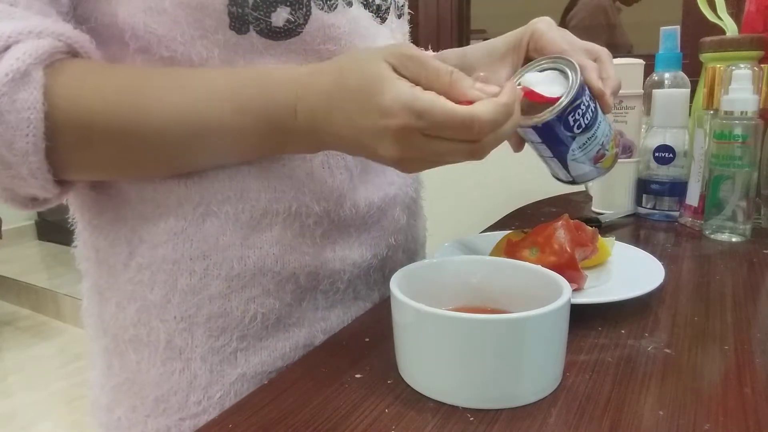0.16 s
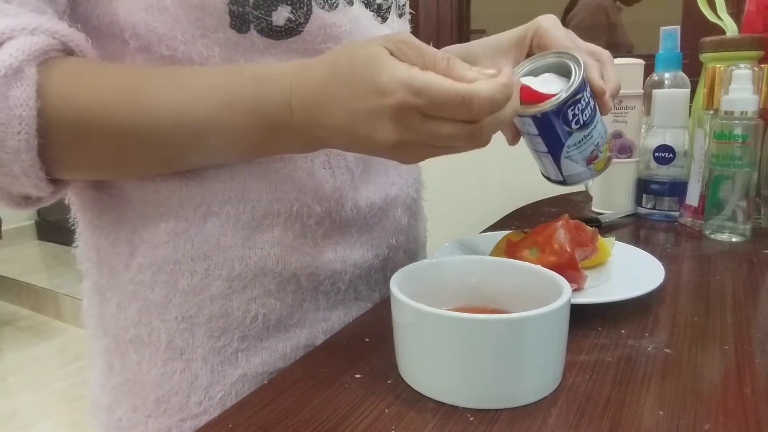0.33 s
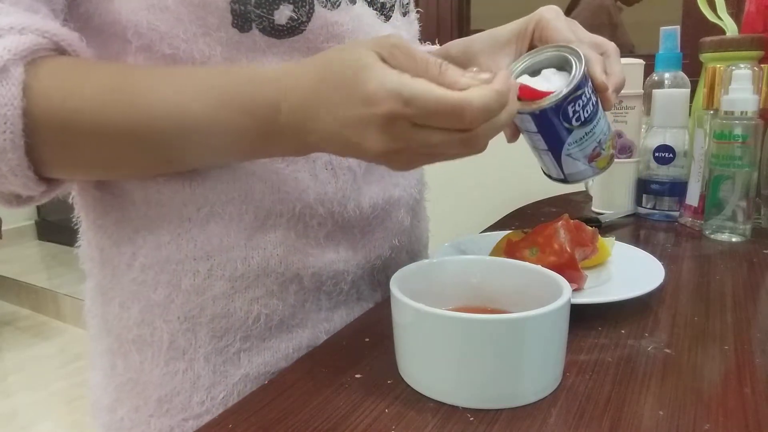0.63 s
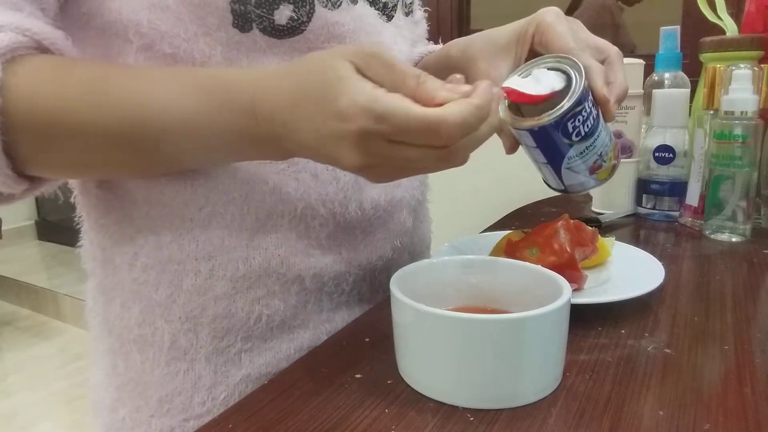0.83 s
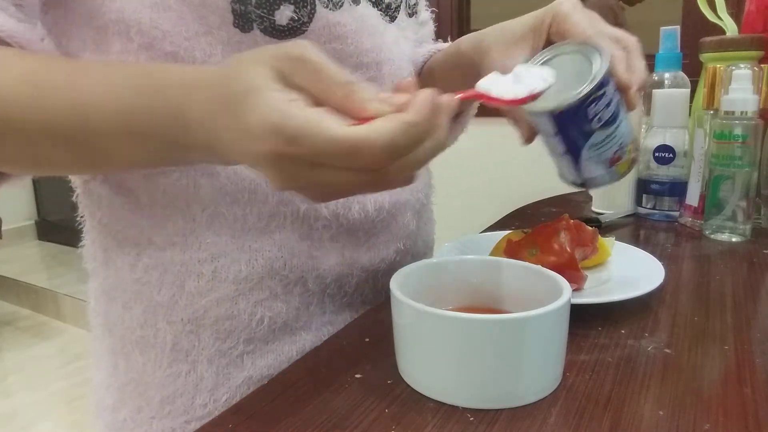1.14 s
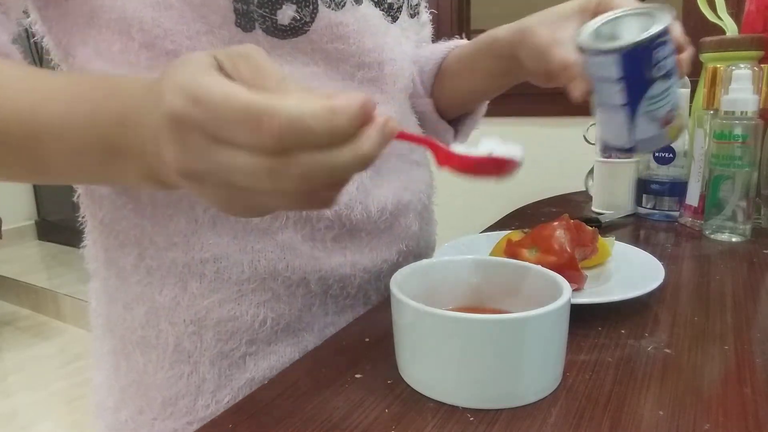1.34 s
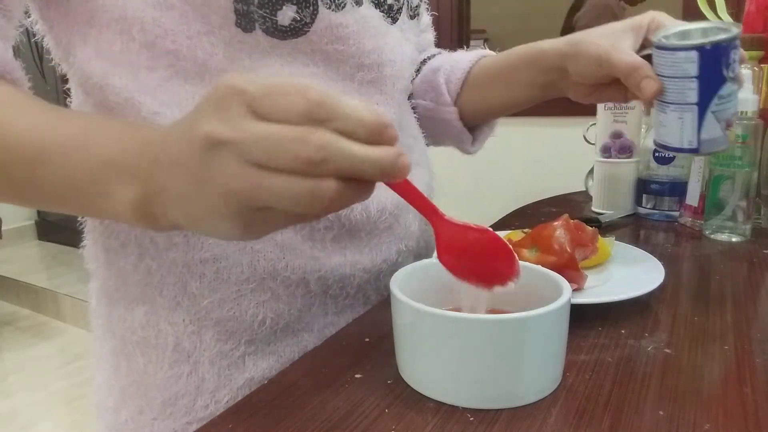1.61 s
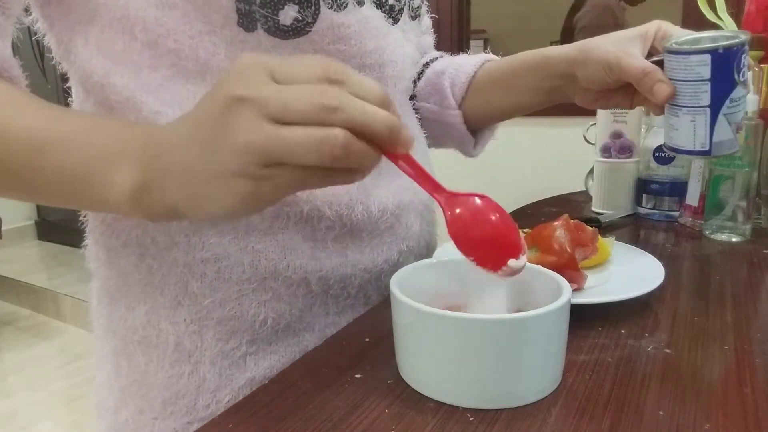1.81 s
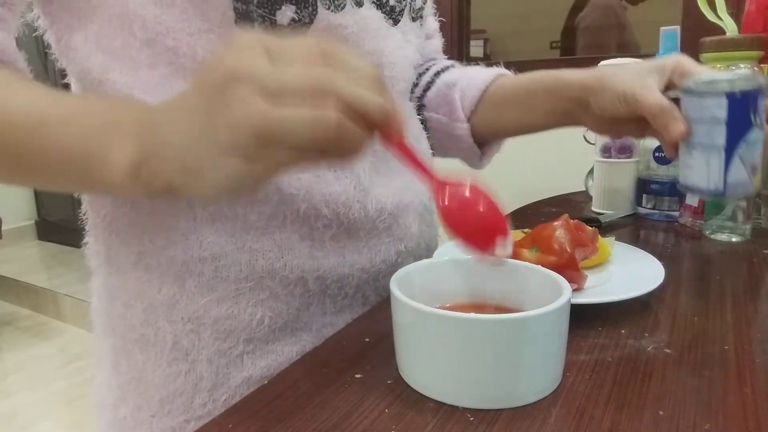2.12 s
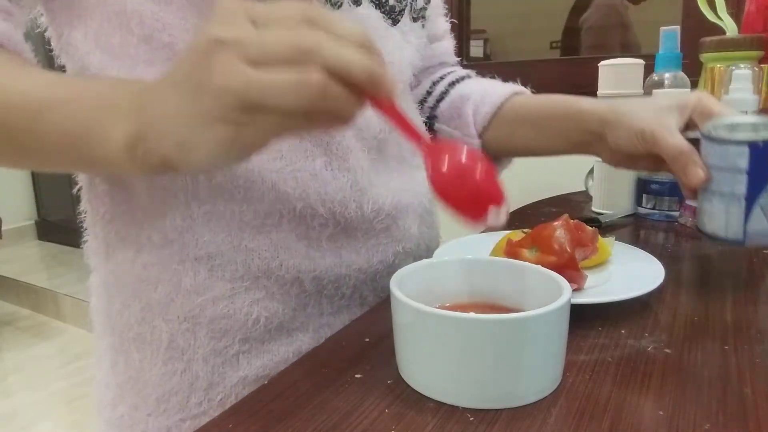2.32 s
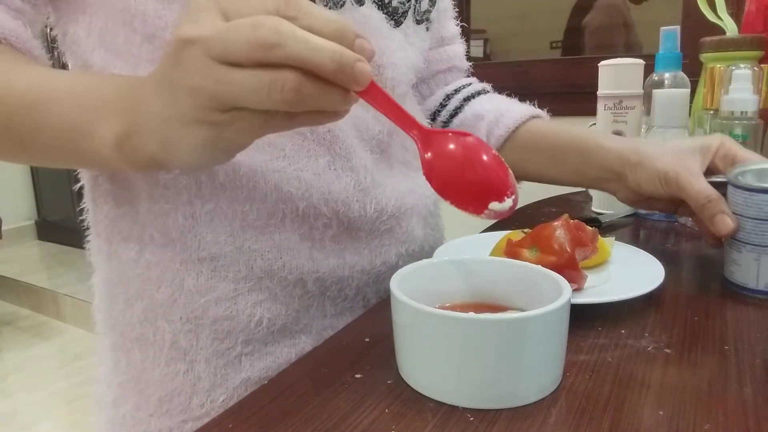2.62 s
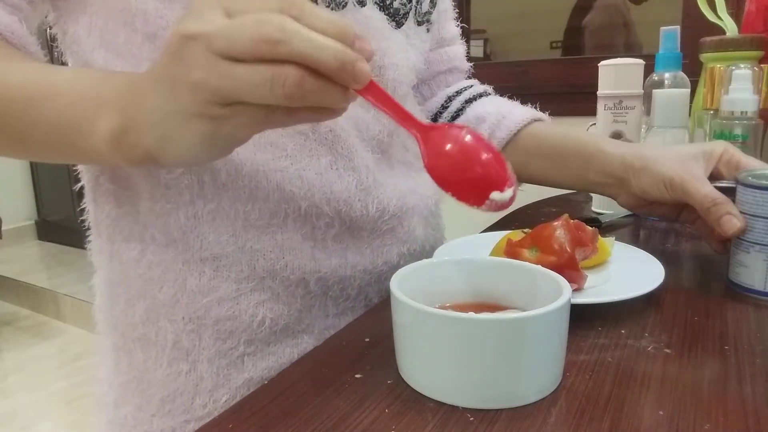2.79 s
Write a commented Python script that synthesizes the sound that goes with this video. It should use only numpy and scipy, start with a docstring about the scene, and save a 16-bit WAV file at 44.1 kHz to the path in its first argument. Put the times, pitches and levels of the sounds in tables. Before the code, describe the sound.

Gritty scrapes and ticks come from a plastic spoon scooping powder out of a tin. After a faint pouring hiss, the tin lands on wood with two knocks, over low kitchen rumble and microphone hiss.

```python
"""Spooning powder from a can

A plastic spoon drags through powder in a small metal can, ticking on its wall, and tips the powder
into a bowl with a soft hiss. The can is set down on a wooden table: one firm knock, then a rocking,
rattling second one. A quiet kitchen rumbles underneath; the microphone hisses."""
import sys
import numpy as np
from scipy import signal
from scipy.fft import rfft, irfft
from scipy.io import wavfile
from scipy.ndimage import uniform_filter1d

SR = 44100
rng = np.random.default_rng(int(sys.argv[2]) if len(sys.argv) > 2 else 0)


def to_wav(s):
    """Save 16-bit WAV."""
    ch = np.atleast_2d(s).T  # columns
    pcm = np.round(np.clip(ch, -1, 1) * 32767)  # PCM
    wavfile.write(sys.argv[1], SR, pcm.astype(np.int16))


N = 130095


def amp(db):
    return 10 ** (np.asarray(db) / 20)


def unit_level(x):
    return x / np.sqrt(np.mean(x ** 2) + 1e-20)


def at_pitch(points, hz):
    pitches, values = np.transpose(points)
    return np.interp(np.log(hz + 1), np.log(pitches + 1), values)


def at_time(points, t, column=1):
    rows = np.array(points, float)
    return np.interp(t, rows[:, 0], rows[:, column])


def add(mix, start, sound):
    part = mix[round(start * SR):][:len(sound)]
    part += sound[:len(part)]


def colour(x, points):
    """Turns each pitch up or down, following rows of Hz and dB."""
    return irfft(rfft(x) * amp(at_pitch(points, np.fft.rfftfreq(len(x), 1 / SR))), len(x))


def ring(x, hz, width):
    """Rings at one pitch; a narrower width rings longer."""
    decay = np.exp(-np.pi * width / SR)
    pole = decay * np.exp(2j * np.pi * hz / SR)
    return 2 * signal.lfilter([1 - decay], [1, -pole], x).real


def background():
    """The kitchen rumbles and the microphone hisses, with a faint flicker in the treble."""
    # Each row: pitch in Hz, relative level in dB.
    spectrum = [(25, -46), (45, -20), (87, 0.5), (160, -2), (270, -12.5), (350, -20), (480, -24.5),
                (800, -30), (1400, -30), (2200, -34.5), (3920, -39), (5500, -45), (7310, -51.5),
                (10000, -45.5), (14000, -38.5), (16000, -41.5)]
    # Each row: time in seconds, relative rumble level in dB.
    rumble_levels = [(0.0, -52.5), (0.63, -51.5), (1.12, -53.5), (2.22, -52), (2.52, -47.5), (2.66, -52.5)]
    # Each row: time in seconds, lift in dB (doubled for the hiss).
    lifts = [(0, 2), (.4, 1.5), (1.0, 1), (1.6, 1.5), (2.0, 2), (2.6, 3), (2.75, 4), (2.95, 5)]
    frames, hz = N // 256 + 5, np.fft.rfftfreq(1024, 1 / SR)
    t = np.arange(frames) * 256 / SR
    real, imag, flicker = rng.standard_normal((frames, 513, 3)).T
    flicker = unit_level(uniform_filter1d(uniform_filter1d(flicker, 8, 0), 10, 1))
    bass = 1 / (1 + (hz[:, None] / 375) ** 4)  # fades from 1 to 0 around 375 Hz
    noise = (real + 1j * imag) * amp(at_pitch(spectrum, hz)[:, None] + 0.7 * (1 - bass) * flicker)
    scale = np.std(signal.istft(noise, nperseg=1024, noverlap=768)[1])
    rumble_db = at_time(rumble_levels, t)
    noise *= amp(bass * (rumble_db - rumble_db.mean()) + (2 - bass) * at_time(lifts, t))
    return amp(-54.5) / scale * signal.istft(noise, nperseg=1024, noverlap=768)[1][:N]


def kitchen_echo(x):
    """Many small echoes blur together, each pitch fading at its own speed."""
    # Each row: pitch in Hz, seconds to fade by 60 dB, relative level in dB.
    bands = [(100, 0.71, 8), (247, 0.42, 6), (344, 0.81, 1), (500, 0.34, -9.5), (680, 0.8, -0.5),
             (905, 0.13, 3), (1390, 0.57, 2), (1720, 0.82, -9), (2700, .45, 2.5), (3950, 0.39, -4),
             (8000, 0.46, -2.5)]
    pitches, fade_s, db = np.transpose(bands)
    echoes = np.zeros(SR // 2)
    slots = np.arange(0, SR // 2 - 20, 20)
    echoes[slots + rng.integers(0, 20, len(slots))] = rng.choice([-1., 1.], len(slots))
    hz, t, spectra = signal.stft(echoes, SR, nperseg=512)
    spectra *= amp(-60 * t / np.interp(hz, pitches, fade_s)[:, None] + np.interp(hz, pitches, db)[:, None])
    tail = signal.istft(spectra, SR, nperseg=512)[1]
    gap = np.zeros(round(0.007 * SR))
    return signal.fftconvolve(x, np.concatenate([gap, tail / np.linalg.norm(tail)]))[:N]


def pour():
    """Fine powder hisses into the bowl; a high hiss stays to the end."""
    # Each row: time in seconds, level in dB.
    levels = [(1.68, -83), (1.72, -75), (1.76, -65), (1.8, -71), (2.0, -73.5), (2.4, -68.5), (2.65, -67),
              (2.95, -66)]
    # Each row: pitch in Hz, relative level in dB.
    spectrum = [(2000, -12), (5000, -5.5), (6500, -3), (8500, 0), (9400, -1), (9900, 5), (10500, -1),
                (12000, 0.5), (16000, -5)]
    hiss = unit_level(colour(rng.standard_normal(N), spectrum))
    return hiss * amp(at_time(levels, np.arange(N) / SR))


def can_ring(x, lip):
    """The can's tones depend on where the spoon touches, and waver as the contact shifts."""
    # Each row: pitch in Hz, width in Hz, dB with the spoon deep, dB with it at the lip.
    tones = [(740, 120, -8, -14), (1165, 42, 11.5, -7), (2770, 98, -1, -10.5), (3100, 100, -1, -3),
             (3760, 450, -10, -13), (4430, 150, -20, -8), (6500, 100, -33, -3), (7380, 130, -5, -6),
             (8100, 200, -19, -15), (9500, 68, -30, 4.5), (9800, 150, -3, -36), (11300, 230, 2, -22),
             (12200, 260, -5, -42)]
    drift = uniform_filter1d(rng.standard_normal((N // 256 + 1, len(tones))), 5, axis=0) * np.sqrt(5)
    waver_db = 2 * np.repeat(drift, 256, axis=0)[:N].T
    return sum((-1) ** k * ring(x * amp(deep + (top - deep) * lip + waver_db[k]), hz, width)
               for k, (hz, width, deep, top) in enumerate(tones))


def wall_ticks(lip):
    """The spoon snaps against the wall and rings the can."""
    # Each row: start in seconds, then dB below 2 kHz, at 2-5 kHz, at 6-10 kHz and above 11 kHz.
    ticks = [(0.108, -24, -34, -35, -34), (.4730, -54, -34.5, -33.5, -34), (0.4976, -47, -40, -60, -46),
             (0.509, -50, -44, -57, -56), (0.5239, -21, -27.5, -57, -56), (0.7088, -40, -35, -52.5, -61),
             (0.7558, -37.5, -42, -41.5, -46), (0.804, -55, -49, -54, -71)]
    t, snaps = np.arange(1024) / SR, np.zeros(N)
    rise_s, fade_s = 0.0007, 0.012
    envelope = amp(-60 * t / fade_s) * np.minimum(t / rise_s, 1)
    for start, low, mid, high, top in ticks:
        spectrum = [(300, low - 20), (500, low), (800, low), (1100, low - 6), (1700, low - 6),
                    (2500, mid), (4500, mid), (5500, high - 10), (7000, high), (10000, high),
                    (11500, top), (16000, top)]
        add(snaps, start, colour(rng.standard_normal(len(t)), spectrum) * envelope)
    return snaps + amp(1) * can_ring(snaps, lip)


def spoon():
    """Clumped powder grains crunch and ring the can under each stroke, joined by the wall ticks."""
    # One list per stroke. Each row: time in seconds, pressure in dB, place from 0 (deep) to 1 (lip).
    strokes = [
        [(0, -54, 0.04), (.03, -56, 0), (.06, -63, 0.1), (.079, -55, 0.18), (.095, -56.5, 0.5),
         (.13, -57.5, 0.5), (.15, -57, 0.03), (.175, -49.5, 0.32), (.19, -51, .4), (.205, -81, 0),
         (.22, -51, 0.6), (.245, -79, 0.6)],
        [(.472, -70, 0.4), (.485, -56, 0), (.492, -59, 1), (.5, -53.5, 0.96), (.525, -52, 0.15),
         (.54, -52, 0.92), (.552, -77, 1), (.58, -60, 0.8), (.6, -74.5, 0.5)],
        [(.733, -76, 0.8), (.737, -49, 1), (.746, -82, 0.6), (.756, -56, 1), (.775, -57, 0.5), (.788, -66, 0.8),
         (.802, -53, .7), (.815, -64, 0.94), (.84, -65, 0.85), (.86, -76, 0.66)],
    ]
    # The powder's crunch. Each row: pitch in Hz, relative level in dB.
    grit = [(400, -26), (1000, -9), (3000, -18.5), (4500, -12), (5700, -18), (8000, -15), (12000, -20.5),
            (16000, -13)]
    grains_per_s, grit_gain, lip_db = 9000, amp(2.5), -10.5
    t, pressure = np.arange(N) / SR, np.zeros(N)
    grains = rng.choice([-1, 1], N) * amp(3 * np.minimum(rng.exponential(1, N), 4))
    grains *= rng.random(N) < grains_per_s / SR
    clumps_db = 1.5 * unit_level(uniform_filter1d(rng.standard_normal(N), 200))
    grains = unit_level(grains * amp(clumps_db))
    lip = at_time(sum(strokes, []), t, column=2)
    for rows in strokes:
        pressure += amp(at_time(rows, t)) * (t >= rows[0][0]) * (t <= rows[-1][0])
    scale = np.std(can_ring(grains, lip) + grit_gain * colour(grains, grit))
    pressed = grains * pressure
    crunch = grit_gain * colour(pressed * amp(lip_db * lip), grit)  # weaker at the lip
    return (can_ring(pressed, lip) + crunch) / scale + wall_ticks(lip)


def rim_touches():
    """Light touches on the can's rim each ring two brief tones."""
    # Each row: start in seconds, level in dB, lower pitch in Hz.
    touches = [(1.83, -51, 614), (2.3669, -47, 1720), (2.386, -56, 1790), (2.401, -57, 1740),
               (2.421, -52.5, 1850), (2.432, -59, 1830)]
    t, out = np.arange(8192) / SR, np.zeros(N)
    rise_s, fade_s = 0.00067, 0.034
    for start, db, hz in touches:
        tones = np.sin(2 * np.pi * hz * t) + 0.45 * np.sin(2 * np.pi * 1.33 * hz * t)
        add(out, start, tones * amp(db - 60 * t / fade_s) * np.minimum(t / rise_s, 1))
    return out


def table_knocks():
    """Each blow is a short push that rings the table and the can's base, with a thin crack on top."""
    # Each row: pitch in Hz, relative level in dB, seconds to fade by 60 dB.
    tones = [(124, -22, 0.091), (254.4, -18.5, 0.12), (280, 2, 0.017), (549, 2.5, 0.02), (600, -33, 0.014),
             (708, -23.5, 0.059), (877, -20, 0.01), (1260, -4, 0.027), (1490, -4.5, 0.021),
             (1713, 9.5, 0.01), (1830, -2.5, 0.011), (2096, -3.5, 0.014), (2830, -23, 0.052),
             (3180, -14, 0.028)]
    # Each row: start in seconds, strength in dB, contact in milliseconds, crack strength in dB.
    blows = [(2.6787, -7.5, 0.54, -44), (2.6826, -17.5, 1.18, -52), (2.8829, -25.5, 0.49, -80),
             (2.8855, -31.5, 0.35, -55), (2.89, -15, 0.37, -42), (2.8934, -22, 0.43, -48),
             (2.9034, -21, 0.31, -66), (2.9090, -28.5, 0.91, -65)]
    # Each row: pitch in Hz, relative level in dB.
    crack_spectrum = [(1500, 5), (3000, 16.5), (4500, 9), (6000, -7), (9000, -2.5), (16000, -10)]
    t, out = np.arange(8192) / SR, np.zeros(N)
    build_s, crack_fade_s = 0.0011, 0.016
    # Tones under 400 Hz belong to the table top, which swings against the can.
    body = sum(np.sign(400 - hz) * amp(db - 60 * t / fade_s) * np.sin(2 * np.pi * hz * t)
               for hz, db, fade_s in tones)
    body *= 1 - np.exp(-t / build_s)
    for start, db, contact_ms, crack_db in blows:
        push = np.sin(np.pi * np.clip(t[:128] * 1000 / contact_ms, 0, 1)) ** 2
        thud = amp(db) * np.convolve(body, push / push.sum())[:len(t)]
        crack = colour(rng.standard_normal(len(t)), crack_spectrum)
        add(out, start, thud + crack * amp(crack_db - 60 * t / crack_fade_s))
    return out


def scene():
    """Spoon and knocks echo in the kitchen, over the pour and the background."""
    scrapes = spoon()
    bass_cut = signal.butter(2, 114, "high", fs=SR, output="sos")  # little bass reaches the air
    knocks = signal.sosfilt(bass_cut, table_knocks() + rim_touches())
    echo = kitchen_echo(amp(-15) * scrapes + amp(-11) * knocks)
    return (scrapes + knocks + echo + pour() + background())[None]


def record(dry):
    """The microphone drops the deepest bass; the highest treble is cut too."""
    bass_cut = signal.butter(3, 57, "high", fs=SR, output="sos")
    treble_cut = signal.firwin(511, 15900, window=("kaiser", 9), fs=SR)
    return signal.oaconvolve(signal.sosfilt(bass_cut, dry), treble_cut[None], "same")


dry = scene()
out = record(dry)
to_wav(out)
```